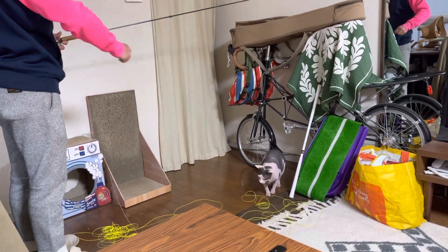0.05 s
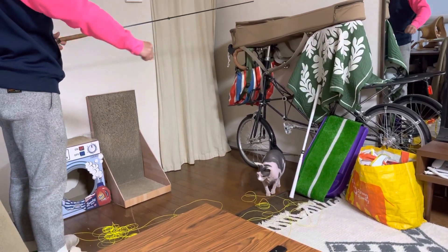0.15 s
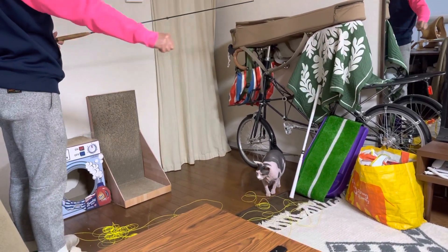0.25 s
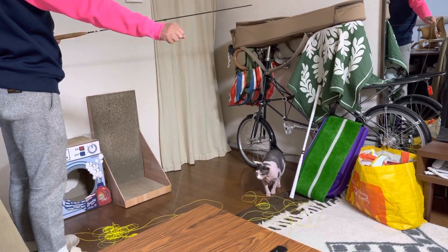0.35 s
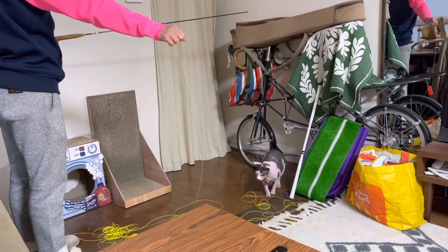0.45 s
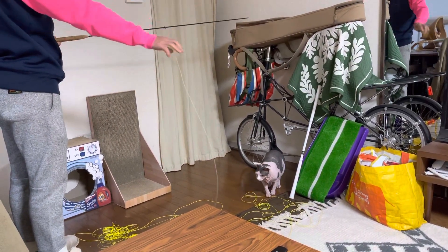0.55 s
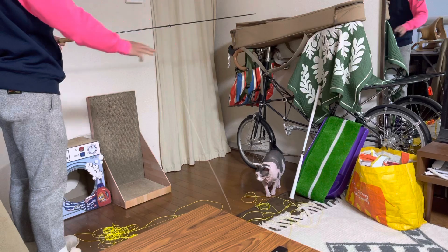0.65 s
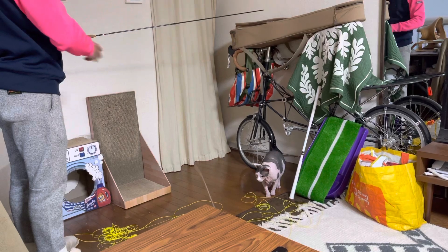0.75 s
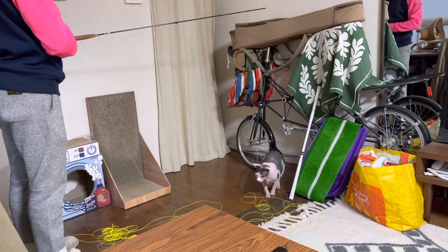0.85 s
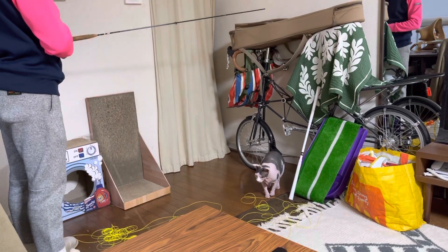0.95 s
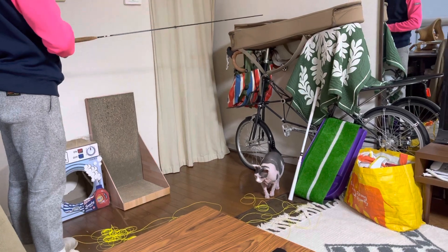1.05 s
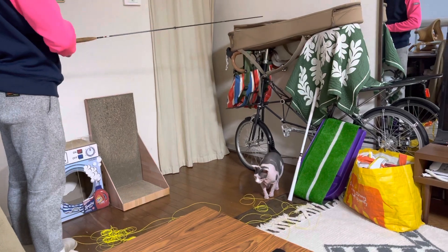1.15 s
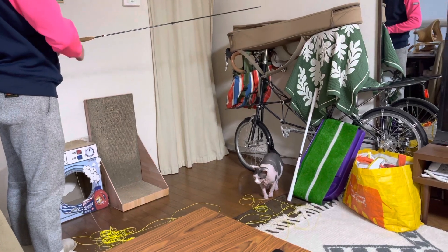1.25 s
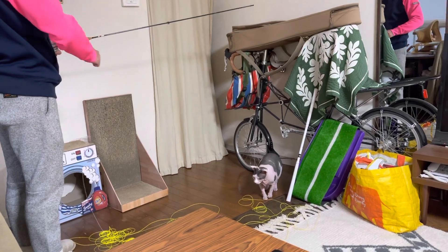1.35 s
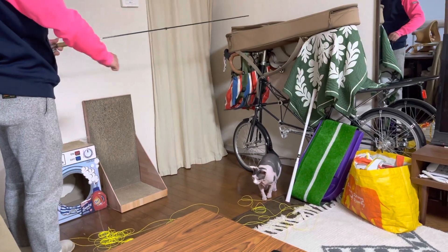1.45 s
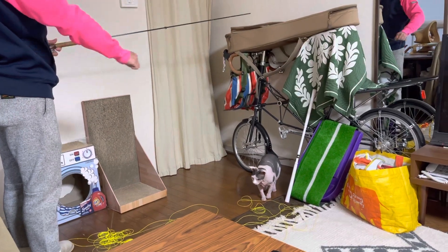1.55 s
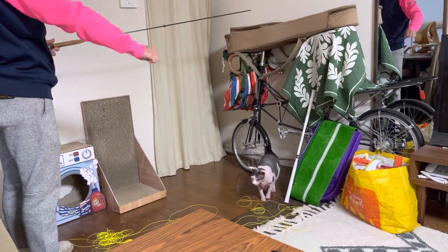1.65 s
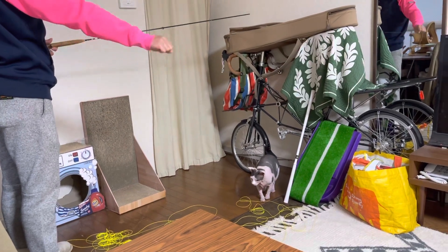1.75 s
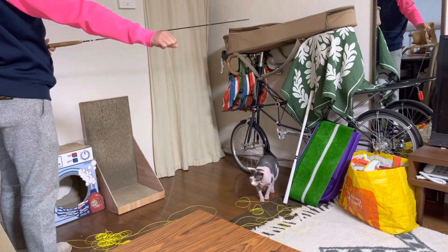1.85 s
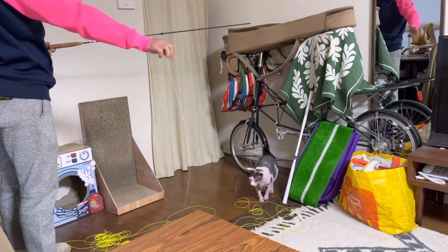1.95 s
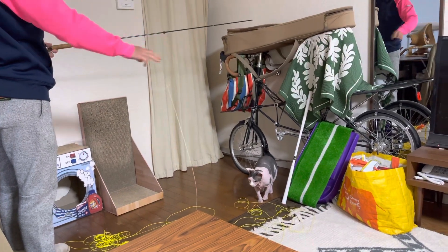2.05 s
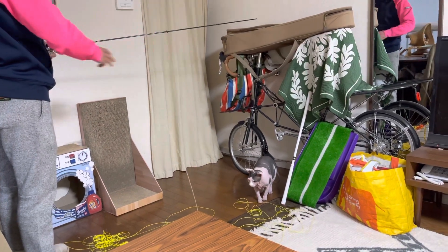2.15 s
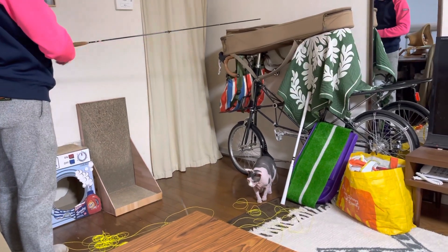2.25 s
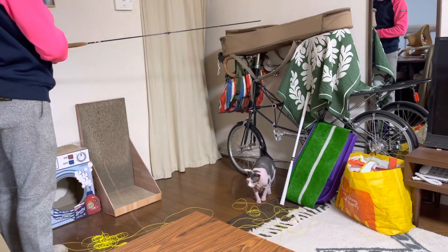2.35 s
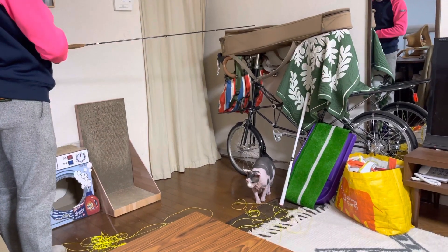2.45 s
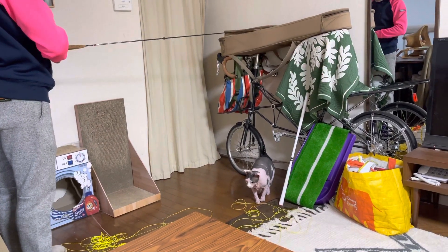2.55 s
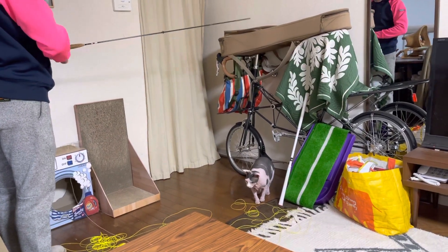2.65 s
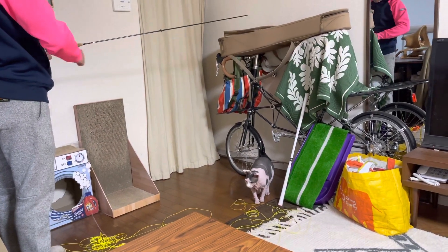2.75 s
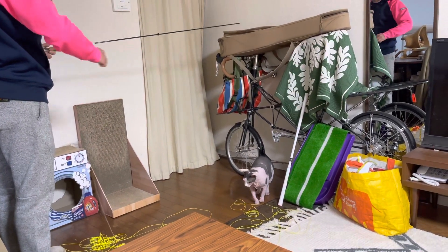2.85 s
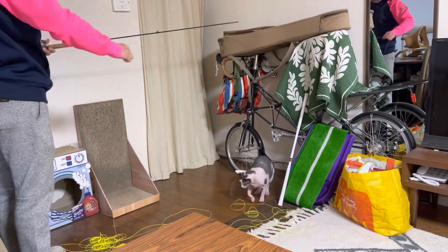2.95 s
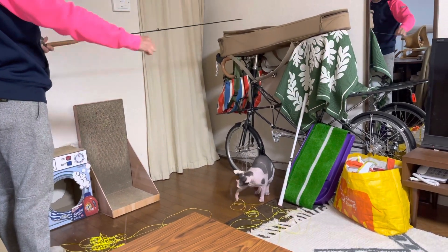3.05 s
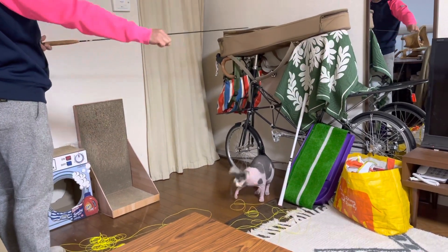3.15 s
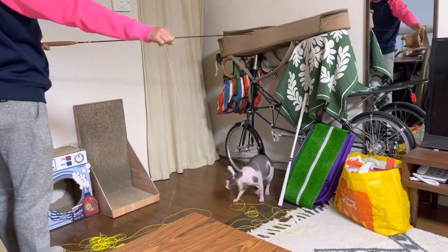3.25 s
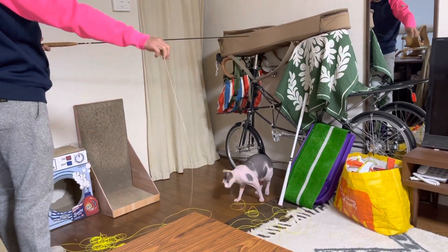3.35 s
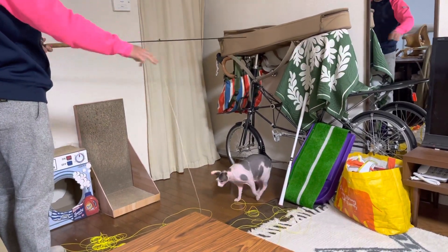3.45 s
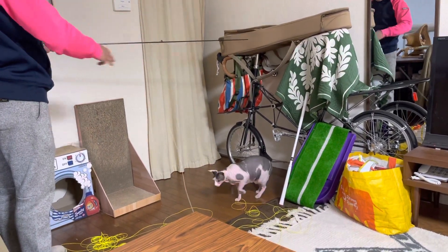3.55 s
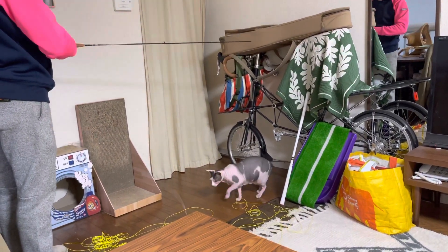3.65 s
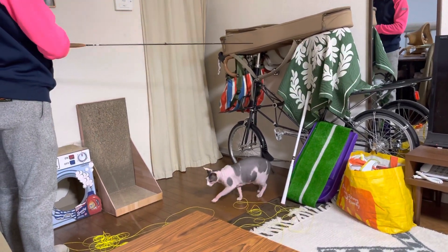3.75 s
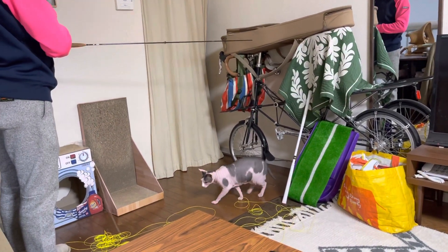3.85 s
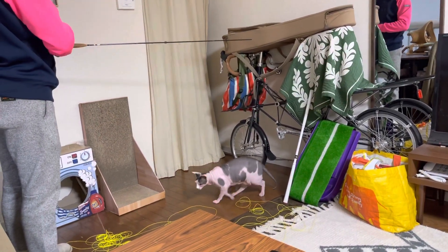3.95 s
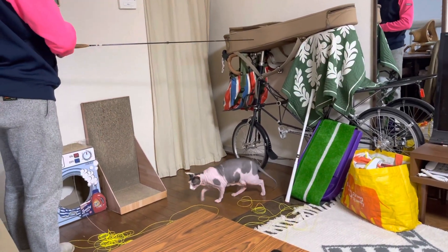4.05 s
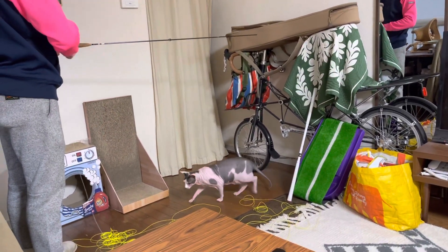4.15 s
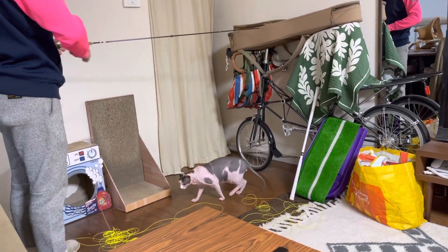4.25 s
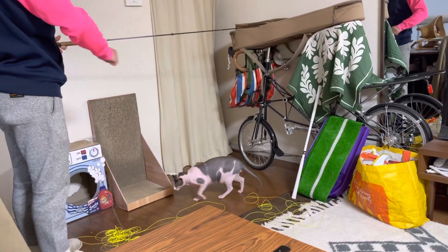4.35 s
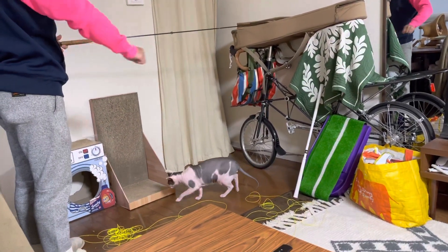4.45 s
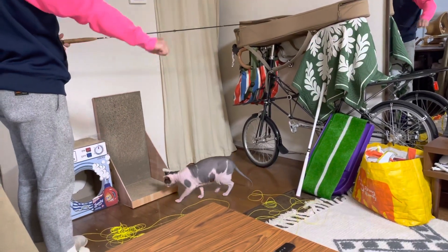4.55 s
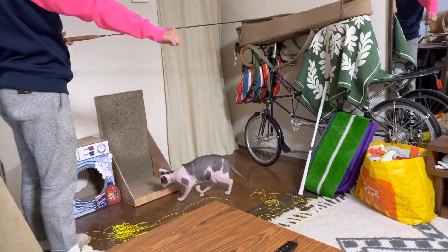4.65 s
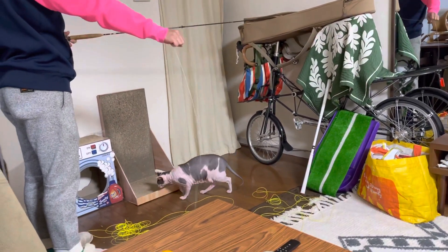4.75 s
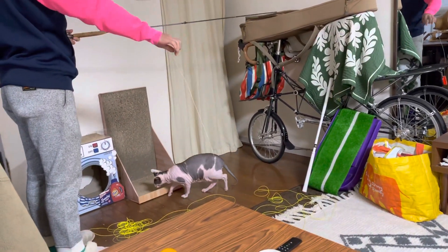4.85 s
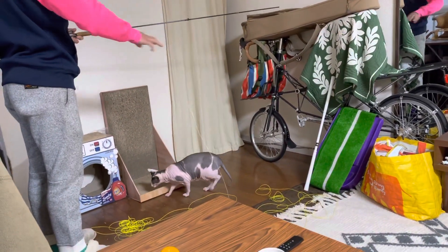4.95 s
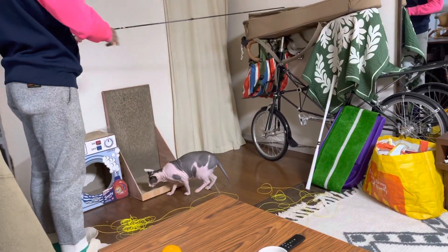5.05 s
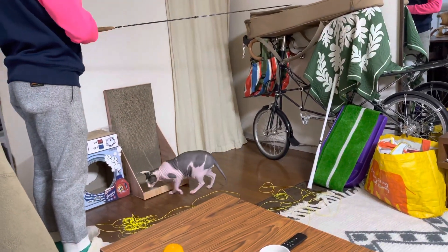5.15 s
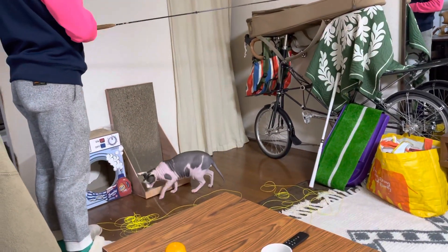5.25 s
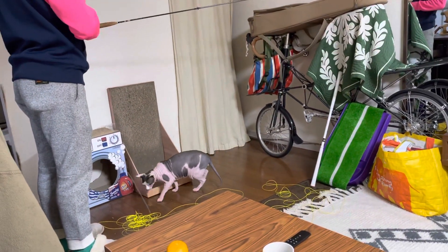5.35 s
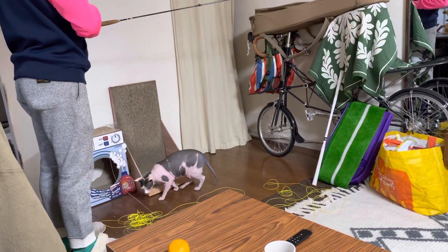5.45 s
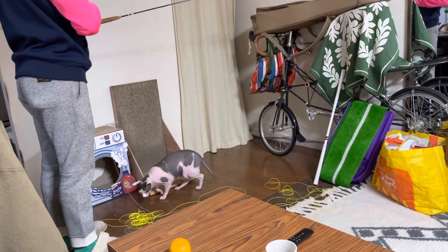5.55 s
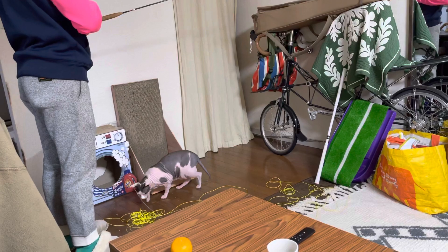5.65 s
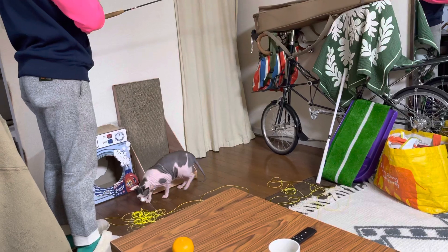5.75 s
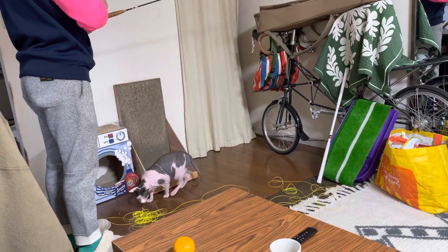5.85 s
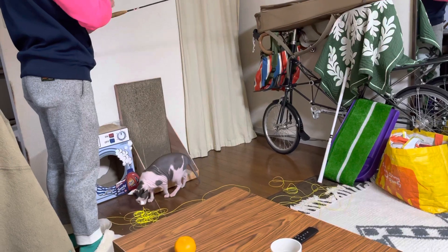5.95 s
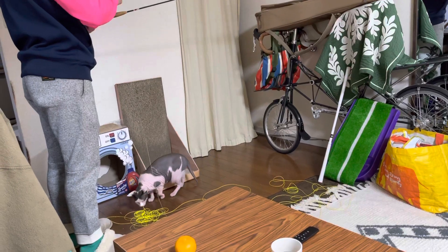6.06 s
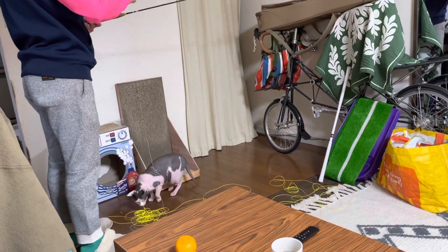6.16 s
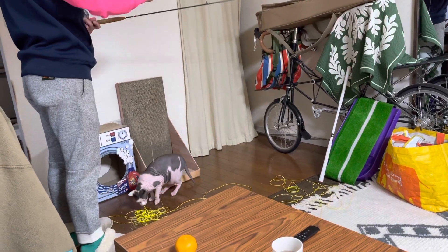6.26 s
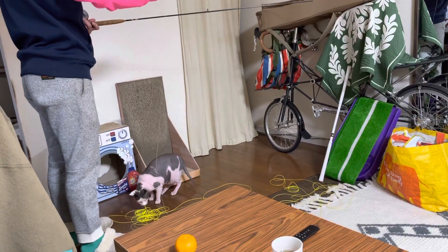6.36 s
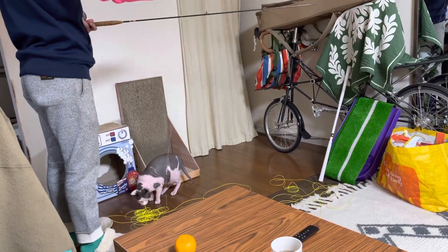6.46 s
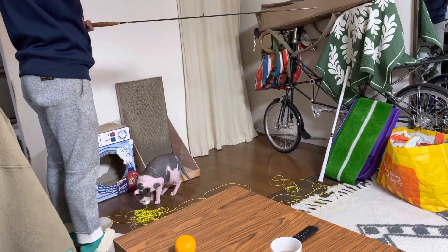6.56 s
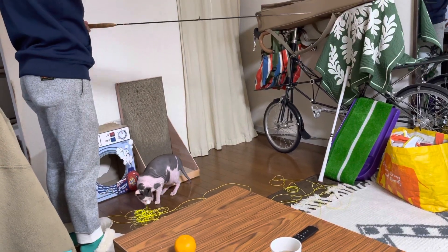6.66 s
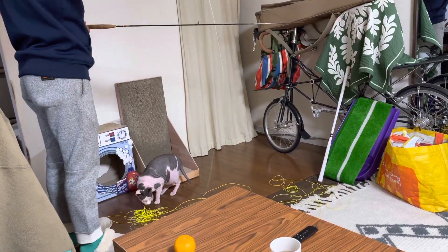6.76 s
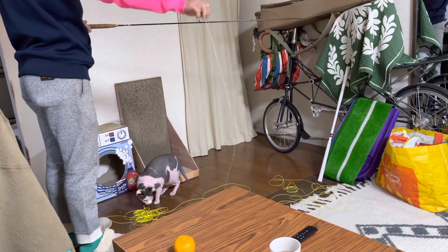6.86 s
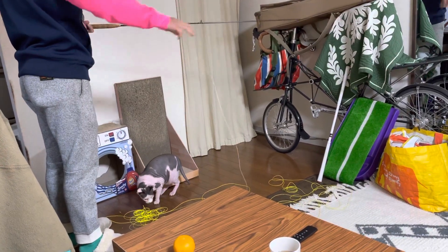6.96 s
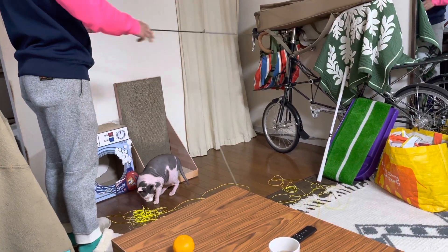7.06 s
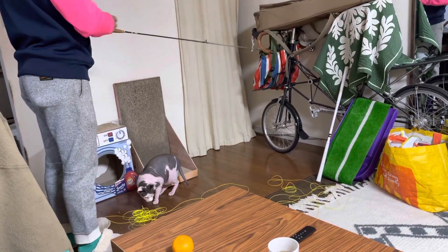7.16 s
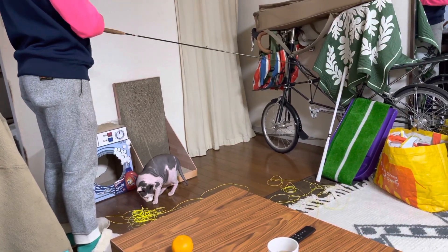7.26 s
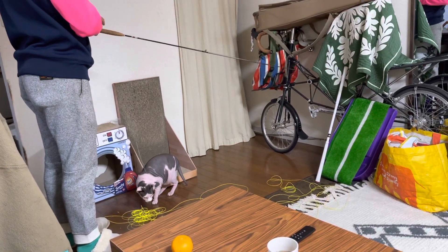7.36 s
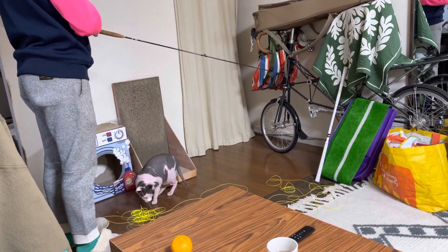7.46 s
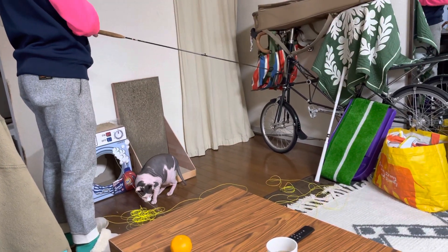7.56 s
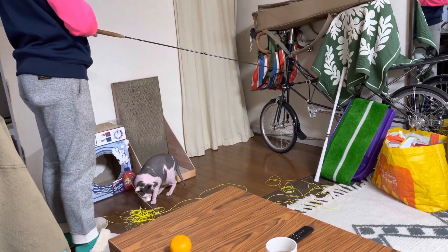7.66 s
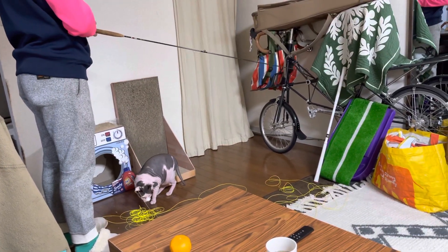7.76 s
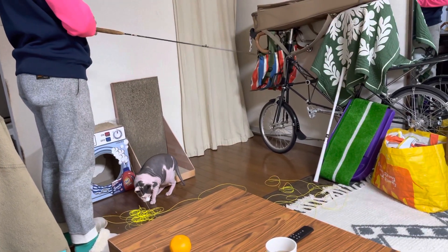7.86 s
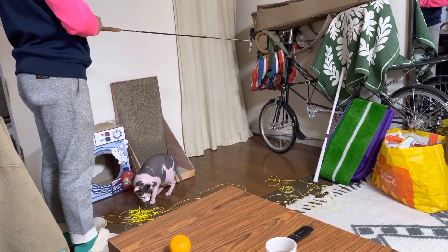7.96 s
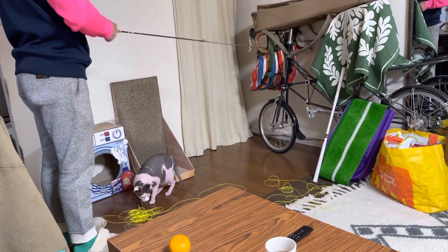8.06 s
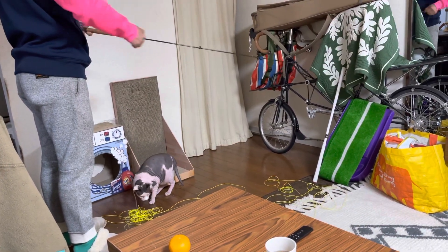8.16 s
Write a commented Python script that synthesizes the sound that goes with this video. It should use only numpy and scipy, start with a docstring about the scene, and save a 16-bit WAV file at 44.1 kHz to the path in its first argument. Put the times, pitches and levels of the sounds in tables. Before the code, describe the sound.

Short runs of metallic ratchet clicks from a fishing reel speed up into a buzz and slow again, over soft room noise.

```python
"""A fly reel buzzes a few metres away in a quiet living room: line is pulled off by hand, six times.
A springy catch, the pawl, snaps over the spool's toothed wheel. Each click rings pawl, wheel, spring
and metal frame; slow clicks make a rattle, fast ones a buzz. Soft room noise and the hum of
appliances lie underneath. Line and sleeve rustle faintly between pulls, and midway the floor rumbles."""
import sys
import numpy as np
from scipy import signal
from scipy.fft import rfft, irfft, next_fast_len
from scipy.io import wavfile

SR = 44100
rng = np.random.default_rng(int(sys.argv[2]) if len(sys.argv) > 2 else 0)


def to_wav(sig):
    """Store sig (one row per channel, or 1-D mono) as 16-bit WAV at the path in sys.argv[1].

    Samples outside -1..1 are clipped; the rate is SR.
    """
    pcm = np.clip(np.atleast_2d(sig), -1, 1) * 32767
    pcm = np.round(pcm).astype(np.int16)
    wavfile.write(sys.argv[1], SR, pcm.T)  # frames by channels


N = 361606
TIME = np.arange(N) / SR

# spool speed as the arm draws the line, one curve per pull: (t/s, f/Hz in teeth per second)
PULL_SPEEDS = [
    [(0, 396.5), (0.05, 410.5), (0.108, 516.1), (0.17, 444.6), (0.24, 453.6), (0.286, 423.4),
     (0.346, 317.8), (0.47, 87.85)],
    [(1.154, 81.64), (1.202, 189.6), (1.274, 303.9), (1.352, 354.4), (1.432, 371), (1.478, 423.3),
     (1.52, 393.1), (1.644, 434.1), (1.735, 406.5), (1.88, 91.46)],
    [(2.602, 97.8), (2.784, 391.6), (2.85, 396.7), (2.875, 436.4), (2.91, 438.7), (2.95, 510.7),
     (3.056, 525.1), (3.146, 435.1), (3.2, 331), (3.295, 86.5)],
    [(4.106, 79.14), (4.168, 157.6), (4.274, 292.3), (4.434, 212), (4.51, 290.5), (4.63, 281.1),
     (4.676, 186.1), (4.715, 95.1)],
    [(5.582, 64.1), (5.626, 48.88), (5.748, 76.13), (5.84, 92.4), (5.924, 153.3), (5.982, 154.8),
     (6.162, 321.9), (6.348, 290.7), (6.588, 498.9), (6.646, 336.8), (6.692, 213.4), (6.735, 93.1)],
    [(7.857, 90.4), (7.885, 119), (8.107, 515), (8.173, 667.7), (8.2, 668.5)],
]
# each pull at the usual speed: (level/dB, brightness/dB, which turns frame and spring down)
PULL_SOUNDS = [(-29, 0.8), (-29, 0.1), (-28.5, 1.46), (-29, .3), (-27, 3.5), (-29, 0.4)]
# share of a click for frame, spring and wheel: (level/dB at the usual speed, dB per octave, wander/dB)
CLICK_SHARES = [(-12.4, 2.5, 0.73), (-9, -1.2, 1.8), (-8, 1.2, 2.4)]
# chosen moments when parts ring out: (t/s, half length/s, change for frame/dB, spring/dB, wheel/dB)
FLARES = [(.11, .03, 0.5, -1, 5.5), (1.478, .02, 1, 4, -1), (1.678, .06, 2, 1, 0),
          (2.81, 0.012, 2, 5.5, -5), (3.03, .09, 2, -4, 1), (5.811, .08, 1.5, 1, 18),
          (5.98, 0.055, -2.5, 8, 2.5), (6.194, 0.048, 2.5, -1, 4.5), (6.579, .025, 2, 0, 4),
          (8.185, 0.018, 5.5, -3.5, 8.5)]
# the spool slips by a single tooth: (t/s, level/dB)
TOOTH_SLIPS = [(7.156, -44), (7.161, -41)]
# ringing tones of frame and spool, spring, pawl and wheel: (f/Hz, level/dB, time to fade by 60 dB/s)
FRAME_MODES = [(607, -18, .06), (1987, -1, 0.044), (2173, 0.5, 0.1), (2460, -4.5, 0.02), (2633, -1, 0.056),
               (2885, -8.5, 0.077), (3575, 2.5, 0.05), (4007, -1, 0.034), (4072, 4.5, 0.036),
               (4348, 5.5, 0.017), (4540, -6, 0.016)]
SPRING_MODES = [(5570, -8, 0.026), (5904, 0, 0.036), (6225, -5, 0.036), (6310, 0, 0.023), (6900, 0, 0.011),
                (7100, -5, 0.0089)]
PAWL_MODES = [(8010, -14.5, 0.0083), (8730, -6.5, 0.0061), (9256, -2, 0.017), (9570, 2.5, 0.0043),
              (10300, 7.5, 0.0045), (10454, 5, 0.0089)]
WHEEL_MODES = [(11400, -0.5, 0.0022), (11015, 2.5, 0.0094), (11200, -13.5, 0.022)]
# tone of the pawl's knock through the reel seat, and of its chatter: (f/Hz, level/dB)
KNOCK_SHAPE = [(150, -37), (450, -30.5), (650, -17), (900, -30), (1300, -28.5), (1650, -12), (2050, -0.5),
               (3100, 1.5), (4300, 4), (5200, 8.5), (6500, 3.5), (9000, 5.5), (12000, -6.5), (15000, -25.5)]
CHATTER_SHAPE = [(300, -41), (1400, -42.5), (2000, -33), (3300, -28.5), (4200, -20.5), (5000, -26.5),
                 (6200, -16.5), (7800, -14.5), (9100, -10), (9600, -13), (10300, 1), (11300, -7),
                 (12600, -22), (14000, -49), (15600, -33.5)]
# tone of the room noise: (f/Hz, level/dB)
AIR_SHAPE = [(20, -37.5), (40, -11), (60, -7), (90, -6.5), (170, -6), (260, -3), (450, -9.5), (800, -9.5),
             (1500, -11.5), (2200, -19), (4000, -34), (6500, -38), (11000, -36), (15000, -68.5)]
# hum of household appliances: (f/Hz, level/dB)
HUM_TONES = [(60, -73.5), (172, -78), (243, -73.5), (320, -74.5), (793, -75), (1000, -77.5)]
# rustles of line and sleeve: (t/s, level/dB, centre f/Hz, rough length/s)
RUSTLES = [(2.339, -68, 8800, 0.014), (3.612, -83, 5020, .06), (3.724, -72.5, 5400, 0.055),
           (3.80, -74.5, 8650, 0.019), (5.035, -66, 3100, 0.019), (5.09, -78, 9100, 0.023),
           (5.54, -68, 8340, 0.03), (7.597, -63.5, 4790, 0.023), (7.691, -70.5, 8350, 0.015)]
# swells of rumble in the floor: (peak t/s, level/dB, half length/s)
RUMBLE_SWELLS = [(3.281, -63.5, 0.24), (3.901, -61, .12), (4.274, -62.5, 0.16), (4.501, -67, 0.41)]
# stereo width of sound from all round: (f/Hz, level/dB of side against middle)
STEREO_WIDTH = [(50, -13), (200, -8.5), (500, -1), (2000, -1.5), (5500, -1), (6200, -8.5), (7400, 5.5),
                (8500, -27), (14000, -6)]
# how far the right channel trails the left: (f/Hz, phase/turns)
RIGHT_LAG = [(0, 0), (6000, -.03), (7500, -.15), (8300, -.02), (8700, 0), (10250, .5), (11000, .68),
             (11750, .85), (12400, 1)]

USUAL_HZ, PAWL_DB_PER_OCTAVE = 300, 3.5  # a faster spool clicks louder; an octave is twice the speed
WANDER_S = .03  # the pawl seats a little differently this often
TAKE_UP_DB, LET_GO_DB, SLACK_S = -3.5, -6.5, 0.0073  # slack line softens the first and last slow clicks
ROOM_T60_S, EARLY_T60_S = 0.21, 0.061


def undb(db):
    """Turn decibels into a gain."""
    return 10 ** (np.asarray(db) / 20)


def unit(x):
    """Scale a sound to an average (rms) level of 1."""
    return x / np.sqrt(np.mean(x ** 2))


def gains(points, size):
    """Gain of a (f/Hz, level/dB) shape at each frequency of a spectrum."""
    hz, db = np.transpose(points)
    return undb(np.interp(np.log(np.fft.rfftfreq(size, 1 / SR) + 1), np.log(hz), db))


def colour(x, points):
    """Give a sound the (f/Hz, level/dB) shape."""
    size = next_fast_len(len(x), real=True)
    return irfft(rfft(x, size) * gains(points, size), size)[:len(x)]


def impulse(points, size=1024):
    """A short tap of energy 1 with the (f/Hz, level/dB) shape."""
    cepstrum = irfft(np.log(gains(points, size)))
    cepstrum[1:size // 2] *= 2  # folding this forward packs the energy at the start
    cepstrum[size // 2 + 1:] = 0
    response = irfft(np.exp(rfft(cepstrum)))
    return response / np.linalg.norm(response)


def through(x, response):
    """Pass a sound through something with this response to a tap."""
    return signal.fftconvolve(x, response)[:N]


def fade(t, t60):
    """A smooth fade, 60 dB down after t60 seconds."""
    return np.exp(-np.log(1000) * t / t60)


def swell(t, peak_s, half_s):
    """A bell-shaped rise and fall, 1 at the peak."""
    return np.exp(-((t - peak_s) / half_s) ** 2)


def pulses(times, sizes, count=6):
    """Sharp taps at exact times, even between samples."""
    index = np.floor(times * SR).astype(int)[:, None] + np.arange(1 - count, count + 1)
    offset = index - times[:, None] * SR
    shape = np.sinc(offset) * np.sinc(offset / count) * ((index >= 0) & (index < N))
    return np.bincount(np.clip(index, 0, N - 1).ravel(), (sizes[:, None] * shape).ravel(), N)


def diffuse(size):
    """Noise arriving from all round, as a left and right pair."""
    padded = next_fast_len(size, real=True)
    mid, side = rfft(rng.standard_normal((2, padded)))
    width = gains(STEREO_WIDTH, padded)
    pair = np.array([mid + width * side, mid - width * side]) / np.sqrt(1 + width ** 2)
    return irfft(pair, padded)[:, :size]


def tooth_times(speed):
    """Time and rate of every tooth that passes the pawl during one pull."""
    s, hz = np.transpose(speed)
    t = np.arange(s[0], s[-1], 1 / SR)
    passed = np.cumsum(np.interp(t, s, hz)) / SR
    drops = np.interp(np.arange(int(passed[-1]) + 1), passed, t)
    return drops, np.interp(drops, s, hz)


def pawl_drops():
    """Every drop off a tooth: t/s, f/Hz, level/dB, and the shares for frame/dB, spring/dB, wheel/dB."""
    rows = [np.array([(s, 60, db, -11, -4, -5) for s, db in TOOTH_SLIPS])]
    seat_times = np.arange(0, TIME[-1] + WANDER_S, WANDER_S)
    seating = rng.standard_normal((len(CLICK_SHARES), len(seat_times)))
    for speed, (db, bright_db) in zip(PULL_SPEEDS, PULL_SOUNDS):
        s, hz = tooth_times(speed)
        octaves = np.log2(hz / USUAL_HZ)
        slack = TAKE_UP_DB * np.exp((s[0] - s) / SLACK_S) + LET_GO_DB * np.exp((s - s[-1]) / SLACK_S)
        pawl = db + PAWL_DB_PER_OCTAVE * octaves + slack * (hz < USUAL_HZ)
        shares = np.array([share + slope * octaves + wander * np.interp(s, seat_times, seat)
                           for (share, slope, wander), seat in zip(CLICK_SHARES, seating)])
        flares = sum(np.outer(lifts, swell(s, at, half)) for at, half, *lifts in FLARES)
        frame, spring, wheel = shares + flares
        rows.append(np.column_stack([s, hz, pawl, frame - bright_db, spring - bright_db, wheel]))
    return np.vstack(rows).T


def ring(modes):
    """A struck metal part rings with several fading tones, scaled to energy 1."""
    t = np.arange(SR // 5) / SR
    response = sum((-1) ** k * undb(db) * fade(t, t60) * np.sin(2 * np.pi * hz * t)
                   for k, (hz, db, t60) in enumerate(modes))
    return response / np.linalg.norm(response)


def chatter(s, size, t60=0.0051, rise_s=0.00043):
    """Each touch of the pawl makes a tiny burst of metallic noise."""
    t = np.arange(SR // 20) / SR
    burst = (fade(t, t60) * (1 - np.exp(-t / rise_s))) ** 2
    power = np.abs(through(pulses(s, size ** 2), burst / burst.sum()))
    return through(np.sqrt(power) * rng.standard_normal(N), impulse(CHATTER_SHAPE))


def reel(scatter_db=1.26, chatter_db=3, pawl_db=-1.5, spring_db=-1.5, frame_db=-2.56,
         rebound_db=-1, rebound_s=.0028):
    """Each drop of the pawl knocks the reel and rings frame, spring, pawl and wheel."""
    s, hz, db, frame_share_db, spring_share_db, wheel_share_db = pawl_drops()
    late, force, bounce, seat = rng.standard_normal((len(s), 4)).T
    # the pawl rattles loosely while the spool is slow or changing speed; a fast, even run sings
    slow = 1 / (1 + (hz / 260) ** 4)
    surge = np.abs(np.gradient(np.log(hz), s))
    loose = np.clip(slow + surge / 7, .12, 1)
    s = s + .016 * loose * late / hz
    size = undb(db + scatter_db * loose * force) * np.sqrt(SR / hz)
    blows = pulses(s, size * undb(frame_share_db))
    knock = through(blows, impulse(KNOCK_SHAPE))
    frame = undb(frame_db) * through(blows, ring(FRAME_MODES))
    spring = undb(spring_db) * through(pulses(s, size * undb(spring_share_db)), ring(SPRING_MODES))
    # a slow pawl has time to bounce, which splits the energy of a drop into a double click
    rebound = undb(rebound_db) * slow
    contacts = np.concatenate([s + 5e-6 * seat, s + rebound_s * undb(0.52 * bounce)])
    sizes = np.concatenate([size, size * rebound]) / np.tile(np.sqrt(1 + rebound ** 2), 2)
    pawl = undb(pawl_db) * through(pulses(contacts, sizes), ring(PAWL_MODES))
    wheel = through(pulses(contacts, sizes * undb(np.tile(wheel_share_db, 2))), ring(WHEEL_MODES))
    return knock + frame + spring + pawl + wheel + undb(chatter_db) * chatter(contacts, sizes)


def room_echo(x, direct_db=-4, early_db=-4, late_db=-7, treble_db=-5):
    """The direct sound, quick echoes off nearby furniture, then a short, duller tail."""
    t = np.arange(SR // 2) / SR
    out = []
    for near, far in zip(diffuse(len(t)), diffuse(len(t))):
        early = near * fade(t, EARLY_T60_S) * (1 - np.exp(-t / .002))
        dull = colour(far, [(5000, 0.0025), (11000, treble_db)])
        late = dull * fade(t, ROOM_T60_S) * (1 - np.exp(-t / 0.0025))
        echoes = undb(early_db) * early / np.linalg.norm(early)
        echoes += undb(late_db) * late / np.linalg.norm(late)
        out.append(undb(direct_db) * x + through(x, echoes))
    return np.array(out)


def room_noise(level_db=-61.5):
    """The soft, steady noise of the room, from all round."""
    return undb(level_db) * unit(np.array([colour(channel, AIR_SHAPE) for channel in diffuse(N)]))


def appliance_hum(width_hz=8):
    """Appliances hum faintly: very narrow bands of noise sound like wavering tones."""
    size = next_fast_len(N, real=True)
    f = np.fft.rfftfreq(size, 1 / SR)
    bands = sum(undb(db) * unit(1 / (1 + ((f - hz) / width_hz) ** 2)) for hz, db in HUM_TONES)
    return irfft(rfft(diffuse(size)) * bands, size)[:, :N]


def rustles(edge_db=-22):
    """Line and sleeve brush in short, soft puffs of hiss."""
    out = np.zeros(N)
    t = np.arange(SR // 3) / SR
    for s, db, hz, length in RUSTLES:
        age, start = t / (length / 2), int(s * SR)
        brush = unit(colour(rng.standard_normal(len(t)), [(hz / 3, edge_db), (hz, 0), (hz * 2, edge_db)]))
        out[start:start + len(t)] += (undb(db) * age * np.exp(1 - age) * brush)[:N - start]
    return out


def floor_rumble(centre_hz=60):
    """Deep noise in the floor swells and sinks away."""
    shape = [(centre_hz / 2, -22), (centre_hz, 0), (centre_hz * 2, -17), (600, -70)]
    rumble = unit(np.array([colour(channel, shape) for channel in diffuse(N)]))
    swells = sum(undb(db) * swell(TIME, s, half) for s, db, half in RUMBLE_SWELLS)
    return swells * rumble


def scene():
    """Reel and rustles echo in the room, over its quiet background."""
    return room_echo(reel() + rustles()) + room_noise() + floor_rumble() + appliance_hum()


def record(dry, top_hz=15800):
    """The right channel trails the left in the treble, and the very highest sound is cut."""
    turns = np.interp(np.fft.rfftfreq(N, 1 / SR), *np.transpose(RIGHT_LAG))
    right = irfft(rfft(dry[1]) * np.exp(-2j * np.pi * turns), N)
    low_pass = signal.ellip(8, .2, 70, top_hz, fs=SR, output="sos")
    return signal.sosfilt(low_pass, np.array([dry[0], right]))


dry = scene()
out = record(dry)
to_wav(out)
```